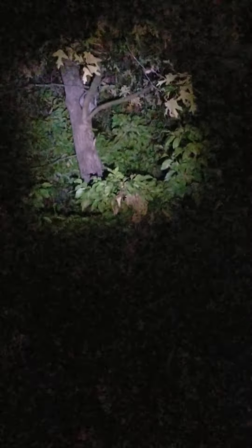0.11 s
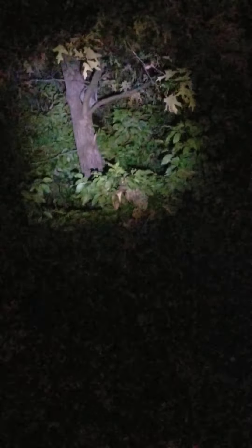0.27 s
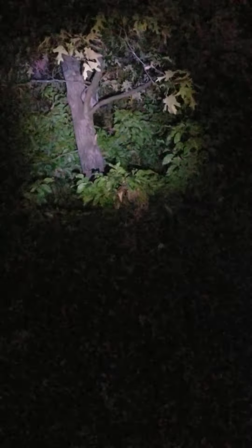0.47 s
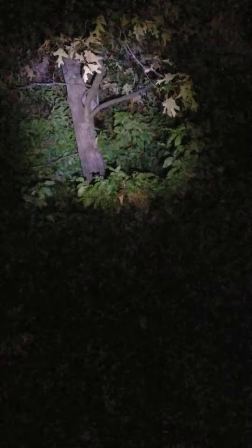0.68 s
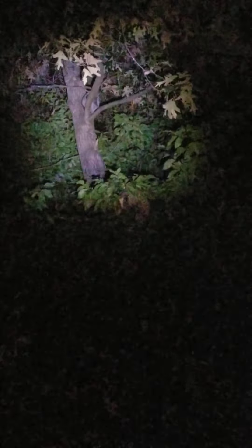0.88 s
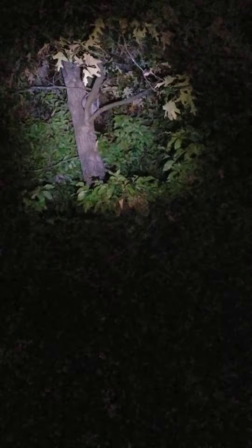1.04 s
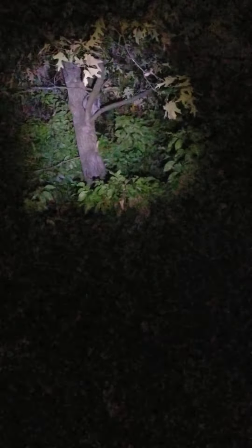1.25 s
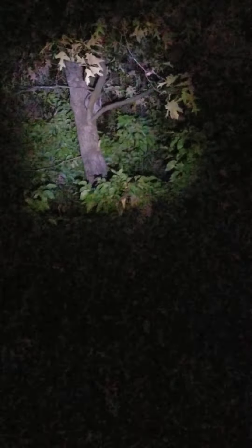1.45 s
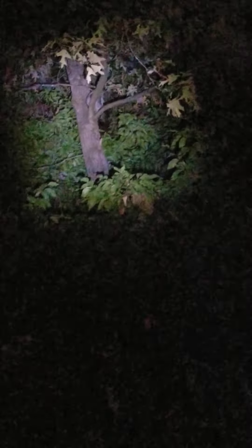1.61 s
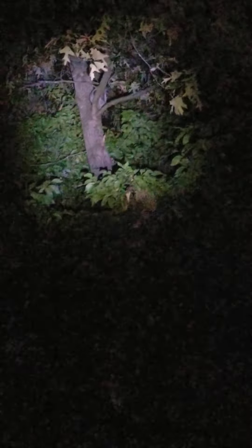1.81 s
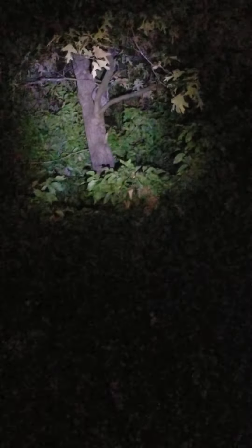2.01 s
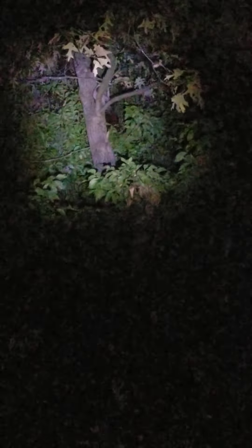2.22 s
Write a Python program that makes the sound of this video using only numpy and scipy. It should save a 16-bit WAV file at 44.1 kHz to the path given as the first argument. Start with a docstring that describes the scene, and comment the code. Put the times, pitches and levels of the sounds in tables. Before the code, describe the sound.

Four crisp, rattly clicks from a small hard object, like a push switch, very close to a stereo microphone in a leafy place at night; faint cricket chirps, distant insects, hiss and low rumble continue behind.

```python
"""Night in a garden: a small hard object close to the microphones, perhaps a push switch, clicks four times.
Each click is a quick rattle of contacts: damped sines ring a hollow shell and knock its body,
noise bursts crack in metal modes, and decaying noise tails are the answer scattered by the bushes.
A cricket (a pitch gated into chirps and wing strokes) and two faint dull taps sound over
a far insect chorus, hiss and rumble of filtered noise; hiss and chorus sink overall."""
import sys
import numpy as np
from scipy import signal
from scipy.fft import rfft, irfft, next_fast_len
from scipy.io import wavfile
from scipy.ndimage import uniform_filter1d, map_coordinates

SR = 44100
rng = np.random.default_rng(int(sys.argv[2]) if len(sys.argv) > 2 else 0)


def digitize_waveform(pressure):
    """Quantize a signal to 16-bit integers and store it at the path in sys.argv[1].

    Rows of a 2-D input are taken as channels; values are limited to [-1, 1].
    """
    field = np.atleast_2d(pressure).T
    bounded = np.clip(field, -1, 1)
    quanta = np.round(bounded * 32767).astype(np.int16)
    wavfile.write(sys.argv[1], SR, quanta)


def nominal_scale(level):
    """Amplitude ratio for a level in decibels (scalar or array-like)."""
    x = np.asarray(level, float) / 20
    return 10 ** x


N = 101429


def unit(x):
    """Scale to rms 1."""
    return x / np.sqrt(np.mean(x ** 2) + 1e-20)


def along(points, hz):
    """Interpolate (freq_hz, value) points on a log frequency axis."""
    point_hz, value = np.transpose(points)
    return np.interp(np.log(hz + 1), np.log(point_hz + 1), value)


def wobble(knots_hz):
    """Smooth random curve through knots_hz random knots a second."""
    knots = rng.standard_normal(int(N * knots_hz / SR) + 4)
    return map_coordinates(knots, [np.arange(N) * knots_hz / SR])


def filtered(x, response):
    """Multiply the spectrum of x by a complex response of frequency."""
    size = next_fast_len(N + SR // 2)
    spectrum = rfft(x, size) * response(np.fft.rfftfreq(size, 1 / SR))
    return irfft(spectrum, size)[..., :N]


def resonances(peaks):
    """Causal sum of second-order bandpass modes (freq_hz, width_hz, peak_db), signs alternating."""
    def response(f):
        total = 0
        for k, (center_hz, width_hz, peak_db) in enumerate(peaks):
            damping = 1j * f * width_hz
            total = total + (-1) ** k * nominal_scale(peak_db) * damping / (center_hz ** 2 - f ** 2 + damping)
        return total
    return response


# Background likeness of left and right: freq_hz, correlation
LIKENESS = [(60, 0.91), (180, 0.85), (550, 0.55), (1650, -0.063), (4970, -0.0027), (15000, -0.01)]


def rush(response, patchy_db):
    """Stereo noise of rms 1: time-frequency patches of random gain, mid/side mixed to the likeness."""
    z = signal.stft(rng.standard_normal((2, N)), nperseg=512)[2]
    patches = uniform_filter1d(rng.standard_normal(z.shape[1:]), 6, 0)
    patches = uniform_filter1d(patches, 14, 1)
    pair = signal.istft(z * nominal_scale(patchy_db * unit(patches)), nperseg=512)[1][:, :N]

    def spread(hz):
        angle = np.arccos(np.clip(along(LIKENESS, hz), -1, 1)) / 2
        return response(hz) * np.array([np.cos(angle), np.sin(angle)])
    mid, side = filtered(pair, spread)
    return unit(np.array([mid + side, mid - side]))


# Rumble spectrum before rms scaling: freq_hz, density_db (per Hz)
RUMBLE_SPECTRUM = [(15, -45), (30, -21), (50, 2), (75, -0.5), (125, -2.5), (200, -12), (300, -16.5),
                   (500, -47)]


def rumble():
    """Low filtered noise with a wavering level."""
    level_db = -64.5 + 1.5 * wobble(5.5)
    return nominal_scale(level_db) * rush(lambda hz: nominal_scale(along(RUMBLE_SPECTRUM, hz)), patchy_db=0.5)


# Hiss spectrum before rms scaling: freq_hz, density_db (per Hz)
HISS_SPECTRUM = [(120, -34), (220, -9), (400, -2.5), (800, -2), (1700, -3.5), (3000, -1.5), (4500, -5),
                 (6500, -6), (8600, -22.5), (11000, -17.5), (13000, -14.5), (16000, -18)]


def hiss(sink_db):
    """Broadband filtered noise that follows the background level."""
    offset_db = 8
    return nominal_scale(offset_db + sink_db) * rush(lambda hz: nominal_scale(along(HISS_SPECTRUM, hz)), patchy_db=1.07)


# Chorus pitch bands, response squared in use: freq_hz, width_hz (one pass), peak_db (one pass)
CHORUS_BANDS = [(4396, 320, -0.19), (5065, 480, -1.8)]


def chorus(sink_db):
    """Far insects: noise through resonances squared, part-following the background level."""
    base_db, sink_share = -58, 0.5
    swell_db = sink_share * (sink_db - sink_db[-1]) + 0.22 * wobble(5.8) + 0.99 * wobble(40)
    return nominal_scale(base_db + swell_db) * rush(lambda hz: resonances(CHORUS_BANDS)(hz) ** 2, patchy_db=1.1)


# Background level course, before the hiss offset: time_s, level_db
BACKGROUND = [(0.0, -57.5), (0.11, -58.5), (0.6, -62), (1.14, -60.5), (1.45, -63.5), (2.3, -63.5)]


def night():
    """Hiss and far insects sink overall above the rumble; both lean left."""
    lean_db = 0.55 * np.array([[1], [-1]])
    time_s, level_db = np.transpose(BACKGROUND)
    sink_db = np.interp(np.arange(N) / SR, time_s, level_db)
    return rumble() + nominal_scale(lean_db) * (hiss(sink_db) + chorus(sink_db))


def ring(t, hz, t60_s, turn):
    """Damped sine with a soft start; turn is its starting phase in cycles."""
    rise_s = .0004
    envelope = nominal_scale(-60 * t / t60_s) * (1 - np.exp(-t / rise_s))
    return envelope * np.sin(2 * np.pi * (hz * t + turn))


# Faint dull taps: start_s, level_db (before the ring envelope)
TAPS = [(1.967, -48.5), (2.0, -55)]


def taps():
    """Each tap is one short damped sine, equal in both ports."""
    pitch_hz, t60_s = 1160, 0.024
    t = np.arange(N) / SR
    return sum(nominal_scale(level_db) * ring(np.maximum(t - start_s, 0), pitch_hz, t60_s, 0)
               for start_s, level_db in TAPS)


# Cricket chirps: start_s, length_s, level_db (before strokes and roughness)
CRICKET_CHIRPS = [(-.09, 0.14, -57), (0.423, 0.23, -58), (0.974, 0.23, -62.5), (1.56, 0.18, -63),
                  (2.07, .17, -63)]


def cricket():
    """Chirps of quick wing strokes on one pitch, smeared by distance: random amplitude and phase."""
    pitch_hz, stroke_hz, stroke_depth, roughness, edge_s = 3165, 39, .5, 1.1, 0.025
    t = np.arange(N) / SR
    gate = np.zeros(N)
    for start_s, length_s, level_db in CRICKET_CHIRPS:
        nearest_end_s = np.minimum(t - start_s, start_s + length_s - t)
        gate += nominal_scale(level_db) * np.clip(nearest_end_s / edge_s, 0, 1)
    stroke_phase = np.array([[0], [1.5]])  # rad, left and right
    strokes = 1 + stroke_depth * np.sin(2 * np.pi * stroke_hz * t + stroke_phase)
    waver = np.array([wobble(170) + 1j * wobble(170) for _ in range(2)])
    carrier = np.exp(2j * np.pi * pitch_hz * t + [[0], [1.6j]])
    return gate * strokes * np.real((1 + roughness * waver) * carrier)


# Contacts, levels before envelope, body gain and filters:
# start_s, ring_db (before radiation), ring_hz, crack_db, knock_db
CONTACT_HITS = [(.2138, -38, 3130, -58, -58), (.2195, -38, 3200, -58, -58), (.2235, -39, 3200, -58, -58),
                (.2295, -34, 3100, -48, -55), (.2328, -28, 3600, -42, -50), (.2352, -20, 3300, -14, -35),
                (.2368, -14, 3300, -13, -30), (.2388, -10, 3500, -7, -28), (.2400, -8, 3400, -10, -25),
                (.2414, -7, 3600, -11, -24), (.2432, -8, 3200, -13, -25), (.2462, -22, 3000, -30, -33),
                (.5082, -30, 3600, -55, -55), (.5106, -31, 3500, -55, -55), (.5133, -27, 3000, -50, -55),
                (.5172, -24, 3500, -45, -50), (.5192, -19, 3600, -18, -35), (.5212, -13, 3100, -14, -27),
                (.5230, -9, 3500, -11, -30), (.5247, -14, 3500, -11, -32), (.5260, -12, 3400, -14, -32),
                (.5281, -9, 3300, -17, -26), (.5315, -28, 3300, -32, -40), (.9150, -29, 3500, -52, -55),
                (.9172, -22, 3400, -44, -55), (.9205, -31, 3500, -52, -55), (.9228, -36, 3400, -50, -55),
                (.9258, -29, 3400, -40, -50), (.9280, -33, 3200, -31, -48), (.9300, -16, 3300, -8, -38),
                (.9312, -15, 3400, -13, -36), (.9328, -11, 3100, -10, -32), (.9340, -16, 3300, -11, -26),
                (.9352, -7, 3300, -10, -30), (.9372, -17, 3000, -20, -32), (.9392, -18, 2700, -28, -25),
                (.9456, -31, 2900, -34, -35), (1.1518, -33, 3300, -55, -55), (1.1550, -41, 3100, -58, -58),
                (1.1575, -40, 3100, -58, -58), (1.1650, -16, 3000, -11, -40), (1.1672, -17, 3300, -7, -35),
                (1.1684, -18, 3100, -10, -38), (1.1692, -10, 3100, -11, -36), (1.1714, -12, 3100, -13, -34),
                (1.1731, -16, 2900, -11, -23), (1.1754, -14, 2900, -24, -21), (1.1782, -24, 2900, -30, -35)]
# Metal modes: freq_hz, width_hz, peak_db
METAL_MODES = [(2460, 960, 6.5), (4800, 1800, 0.5), (6480, 610, -19.5), (11080, 1290, 5),
               (12900, 1660, 6.5), (14400, 1200, 4.5), (15300, 830, 4.5)]
# Body modes: knock_pitch_multiple, level_db (relative), t60_s
KNOCK_MODES = [(1, 3.5, 0.012), (1.6, -4, 0.016), (2.2, 5.5, 0.012), (3.2, 7.5, 0.012)]


def rattle(grip_s, until_s, knock_hz, body_db, zing_db):
    """Every contact of one click rings the shell, cracks in the metal and knocks the body."""
    ring_t60_s, partner_ratio, partner_db = .008, 1.14, -11  # shell mode and its upper neighbour
    crack_t60_s, crack_rise_s, skirt_db = .008, .0004, -22  # skirt: broadband share of the crack
    radiation_db, small_hz = 2, 387
    t = np.arange(SR // 20) / SR
    fade = nominal_scale(-60 * t / crack_t60_s) * (1 - np.exp(-t / crack_rise_s))
    shell, crack = np.zeros(N), np.zeros(N)
    for start_s, ring_db, ring_hz, crack_db, knock_db in CONTACT_HITS:
        if not grip_s <= start_s < until_s:
            continue
        turns = rng.random(8)
        grit = fade * rng.standard_normal(len(t))
        grit *= np.linalg.norm(fade) / np.linalg.norm(grit)
        tone = ring(t, ring_hz, ring_t60_s, 0)
        tone += nominal_scale(partner_db) * ring(t, ring_hz * partner_ratio, ring_t60_s, turns[0])
        knock = sum(nominal_scale(level_db) * ring(t, multiple * knock_hz, t60_s, turn)
                    for (multiple, level_db, t60_s), turn in zip(KNOCK_MODES, turns[1:]))
        first = round(start_s * SR)
        shell[first:][:len(t)] += nominal_scale(ring_db + radiation_db) * tone + nominal_scale(knock_db + body_db) * knock
        crack[first:][:len(t)] += nominal_scale(crack_db) * grit
    # the zing is a metal mode that the grip damps more or less
    metal = resonances([(8400, 650, zing_db)] + list(METAL_MODES))

    def small(hz):  # so small an object radiates little bass
        return (1j * hz / (small_hz + 1j * hz)) ** 2
    return filtered(shell, small) + filtered(crack, lambda hz: small(hz) * (metal(hz) + nominal_scale(skirt_db)))


def scatter(x, t60_of, size):
    """Convolve with two unrelated noise tails in which each frequency dies at its own speed."""
    hz, t, z = signal.stft(rng.standard_normal((2, size)), SR, nperseg=128)
    tail = signal.istft(z * nominal_scale(-60 * t / t60_of(hz)[:, None]), SR, nperseg=128)[1]
    tail = tail / np.linalg.norm(tail, axis=1)[:, None]
    return signal.fftconvolve(x[None], tail, axes=1)[:, :N]


# Port level difference: freq_hz, left_over_right_db
NEARER_PORT = [(300, 3.5), (1000, 2.5), (3000, 1.5), (8400, 4), (11000, 0), (14000, 1.5)]


def at_ports(x):
    """Direct sound: the right port hears it later and, at most frequencies, weaker."""
    lag_s = .0003
    side = np.array([[-.5], [.5]])
    return filtered(x, lambda hz: nominal_scale(-side * along(NEARER_PORT, hz)) * np.exp(-2j * np.pi * hz * lag_s * side))


# Gain of the blur that differs between ports: freq_hz, share
BLUR_SHARE = [(500, 0.7), (3000, 0.07), (12000, 0.99)]


def blur(x):
    """Hand and casing smear the click through short unrelated tails."""
    t60_s = 0.0079
    return filtered(scatter(x, lambda hz: t60_s + 0 * hz, size=512), lambda hz: along(BLUR_SHARE, hz))


# Decay of the bushes: freq_hz, t60_s
BUSH_DECAY = [(400, 0.26), (2500, 0.24), (6000, 0.32), (14000, 0.22)]
# Spectrum of their answer: freq_hz, gain_db (before the answer level of each click)
BUSH_SPECTRUM = [(300, 10), (1800, 2.5), (2600, 7), (3500, -4), (5500, 8.5), (8000, -0.5), (11000, 1),
                 (15500, 6)]


def bushes(x, answer_db):
    """The bushes scatter the click back as a longer coloured tail."""
    far = scatter(x, lambda hz: along(BUSH_DECAY, hz), size=SR // 3)
    return filtered(far, lambda hz: nominal_scale(answer_db + along(BUSH_SPECTRUM, hz)))


# Grip of each click: start_s, knock_hz, knock_gain_db, zing_db, bush_answer_db
CLICK_GRIPS = [(0, 560, -2.5, 1.5, -20), (.4, 560, -3, -20, -17), (.7, 573, -1, -34, -19.5),
               (1.1, 961, 0.5, -38, -17)]


def clicks():
    """Each rattle sums direct sound, blur and bush answer, with new random tails for each click."""
    ends_s = [grip[0] for grip in CLICK_GRIPS[1:]] + [N / SR]
    out = np.zeros((2, N))
    for (start_s, knock_hz, body_db, zing_db, answer_db), until_s in zip(CLICK_GRIPS, ends_s):
        x = rattle(start_s, until_s, knock_hz, body_db, zing_db)
        out += at_ports(x) + blur(x) + bushes(x, answer_db)
    return out


def scene():
    """All sources at the two ports."""
    return night() + taps() + cricket() + clicks()


def roll_off(x):
    """The treble ends steeply here."""
    return signal.sosfilt(signal.butter(12, 16630, fs=SR, output="sos"), x)


def record(dry):
    """A steep lowpass cuts the extreme treble."""
    top_hz = 15900
    mix = filtered(dry, lambda hz: 1 / (1 + (hz / top_hz) ** 60))
    return roll_off(mix)


dry = scene()
out = record(dry)
digitize_waveform(out)
```